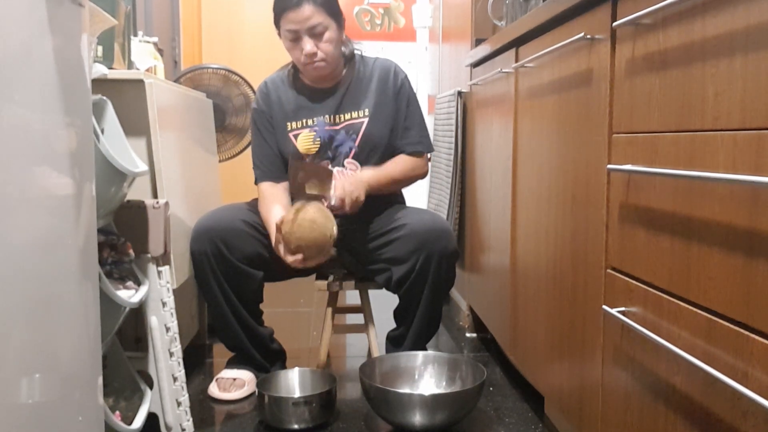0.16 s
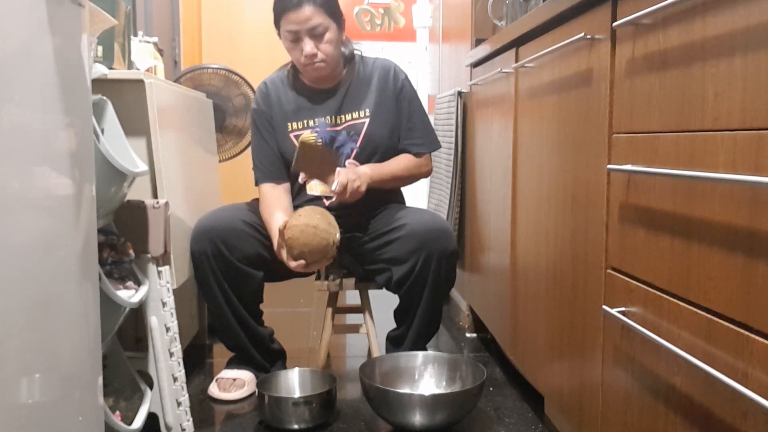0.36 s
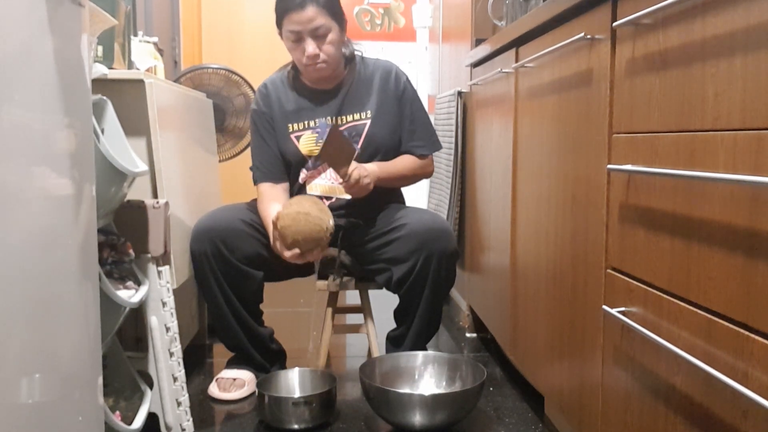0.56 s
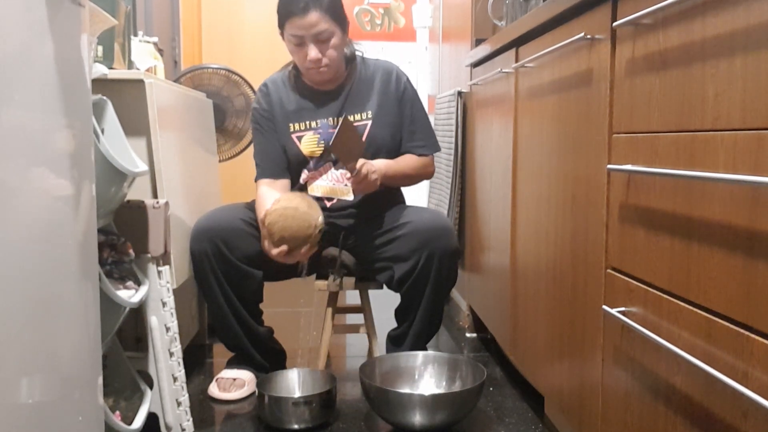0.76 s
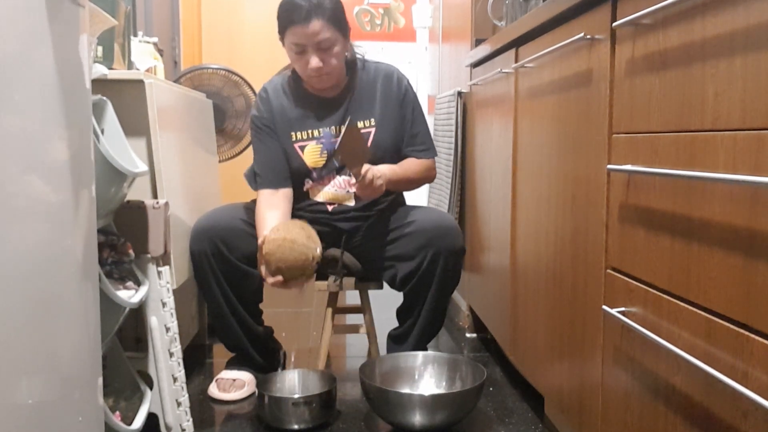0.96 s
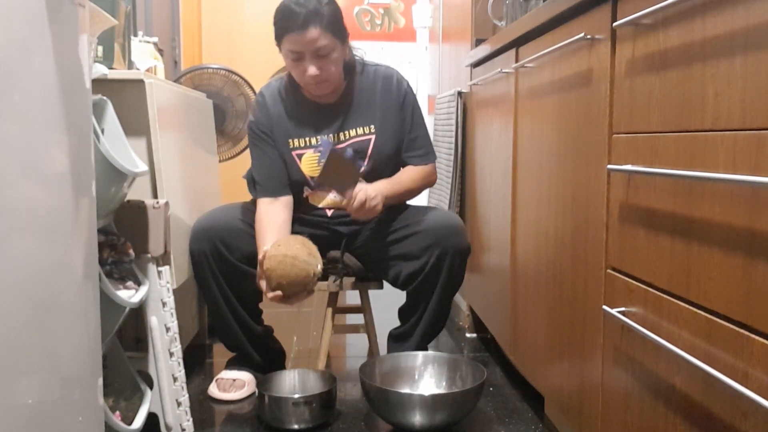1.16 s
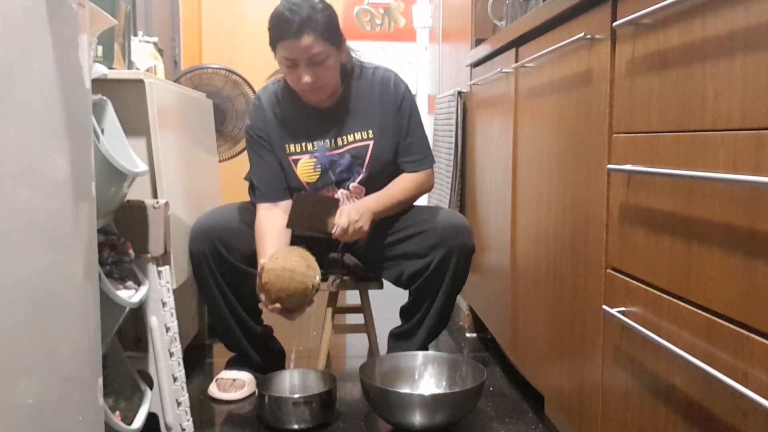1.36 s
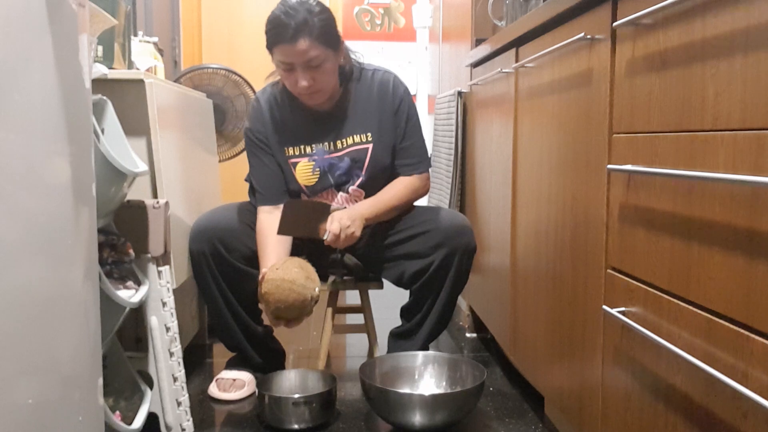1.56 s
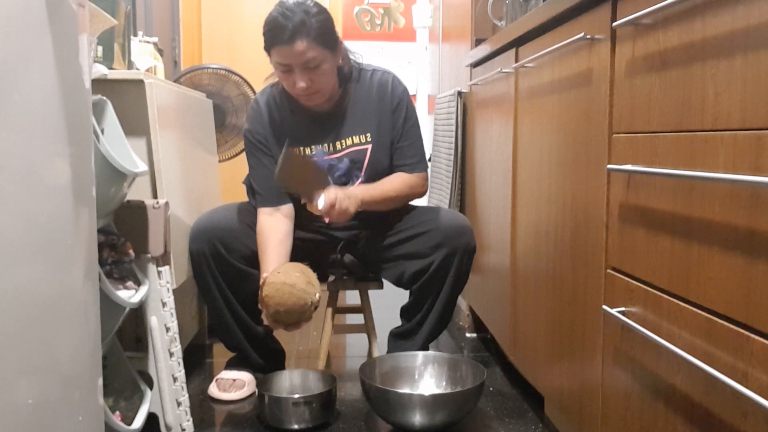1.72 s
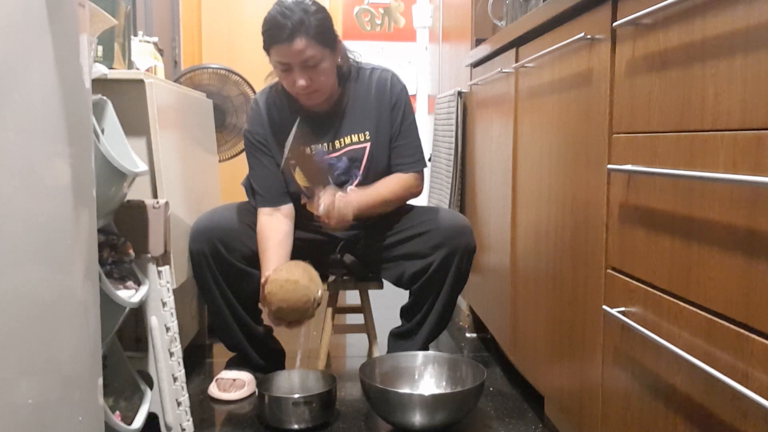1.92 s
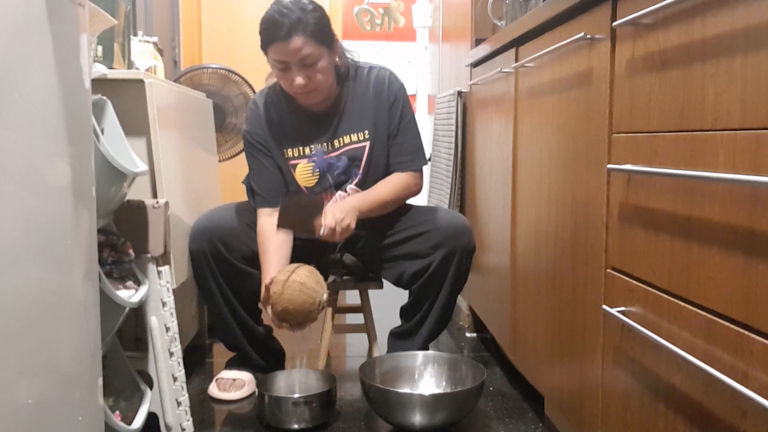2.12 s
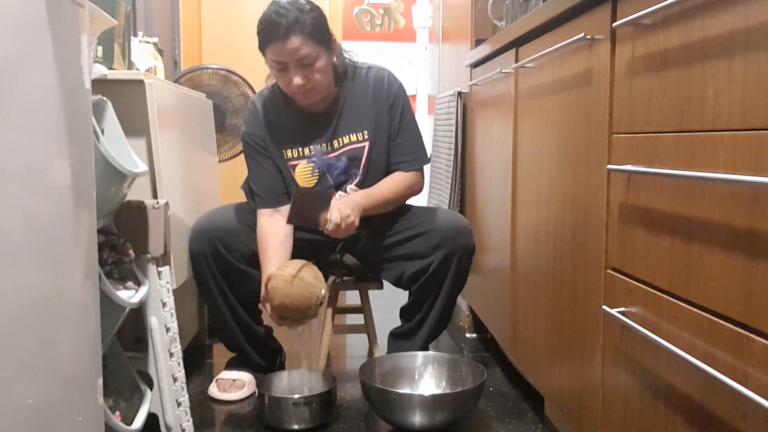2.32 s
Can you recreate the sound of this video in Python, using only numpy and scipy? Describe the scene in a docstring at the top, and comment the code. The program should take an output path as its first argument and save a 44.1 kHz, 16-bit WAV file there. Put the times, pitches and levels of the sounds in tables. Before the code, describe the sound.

Two sharp cleaver knocks on a hand-held coconut, its water trickling into a steel pot after the first

```python
"""A narrow, hard-walled kitchen, heard by a pair of microphones over a low room hum.
A cleaver strikes a hand-held coconut twice: noise bursts crack the shell, decaying sines ring nut and blade.
After the first blow coconut water dribbles into a steel pot: spatter and drops are short noise bursts,
bubbles are rising chirps, and the pot is a set of resonators driven by noise and drop strikes.
No distance is set; the balance of direct sound to room decay makes a source seem near or far."""
import sys
import numpy as np
from scipy import signal
from scipy.fft import rfft, irfft, next_fast_len
from scipy.io import wavfile

SR = 44100
rng = np.random.default_rng(int(sys.argv[2]) if len(sys.argv) > 2 else 0)


def materialize(psi):
    """Save the field psi as 16-bit PCM at rate SR to the path in sys.argv[1].

    A 1-D psi becomes a single channel; in a 2-D psi each row is a channel.
    """
    bounded = np.clip(np.atleast_2d(psi).T, -1, 1)
    quanta = np.round(bounded * 32767).astype(np.int16)
    wavfile.write(sys.argv[1], SR, quanta)


N = 103635

# All levels are relative until their sources are mixed; colours are per third octave.
# kitchen reverberation: pitch_hz, t60_s, left_right_likeness (0-1), left_minus_right_db
ROOM = [(79.6, 0.38, 0.93, 2.5), (300, 0.23, 0.97, 0.5), (556, 0.34, 0.52, 2), (1120, 0.27, 0.07, 1),
        (2600, 0.31, 0, 5), (5030, 0.32, 0.02, 4.5), (9300, 0.3, 0, 7.5), (15000, 0.25, 0.2, 0)]
# background hum: pitch_hz, level_db
HUM_COLOUR = [(20, -89), (35, -59), (50, -56), (63, -53), (85, -62), (125, -55), (160, -71), (200, -62.5),
              (260, -63), (450, -57), (750, -59.5), (1100, -67), (2200, -66.5), (3300, -76.5),
              (5000, -83.5), (7500, -98), (11000, -75.5), (16000, -89)]
# swell of the deep rumble: time_s, level_db
RUMBLE_SWELL = [(0, 2), (.5, 1), (.8, 4), (1.1, 3.5), (1.35, 2.5), (1.7, 1), (1.95, -4.5), (2.35, -5)]
# cleaver blows: start_s, level_db, crack_above_room_db, crack_time_constant_s
BLOWS = [(.2049, 1, -0.5, 0.0044), (2.0237, 1.5, 7.5, 0.0049)]
# colour of the cracking shell: pitch_hz, first_blow_db, second_blow_db
CRACK_COLOUR = [(35, -69, -66), (79, -40, -40.5), (125, -34, -51), (162, -42, -43.5), (256, -22, -38),
                (388, -26.5, -26.5), (625, -26, -29.5), (754, -30.5, -31), (1090, -26, -34.5),
                (1440, -22, -30.5), (2450, -19, -24.5), (3350, -27.5, -28.5), (4970, -31.5, -36),
                (7570, -37, -43), (10130, -26.5, -25.5), (13500, -35, -33), (16200, -38, -36)]
# resonances of the hollow nut and, lowest, of the narrow room around it: pitch_hz
NUT_HZ = [118.5, 203, 229, 321, 383, 455, 508, 552, 830, 899, 1120, 1509, 1841, 2434, 2536]
# their decay: t60_s
NUT_T60_S = [0.27, 0.35, 0.22, 0.19, 0.16, 0.22, .33, 0.24, 0.11, 0.31, 0.094, 0.39, 0.32, 0.091, 0.13]
# their level, one row per blow: level_db
NUT_DB = [
    [-15.5, -30, -20, -16, -16, -31, -23.5, -24, -32, -35, -23.5, -30, -24, -18, -29],
    [-48, -30.5, -30, -17, -12.5, -21, -24, -25, -22, -29, -30, -47, -49, -28, -21],
]
# modes of the blade: pitch_hz
BLADE_HZ = [1997, 3900, 8834, 9028, 9677, 14050]
# their decay: t60_s
BLADE_T60_S = [.48, 1.13, 0.38, 0.25, .26, .25]
# their level, one row per blow: level_db
BLADE_DB = [
    [-25.5, -57.5, -43, -40, -40, -52],
    [-37.5, -62, -35, -32, -31, -44],
]
# flow of the dribble: time_s, level_db
FLOW = [(0, -60), (.48, -24), (.51, -3), (.56, -7), (.61, -34.5), (.66, -21), (.79, -17), (.82, -1.5),
        (.92, -2), (1.03, -15), (1.08, -8), (1.25, -1.5), (1.45, -7), (1.54, -6), (1.65, -0.5), (1.8, -6.5),
        (1.92, -11), (2.0, -18.5), (2.12, 2), (2.27, 0), (2.35, 1.5)]
# colour of spatter in the pot: pitch_hz, level_db
SPATTER_COLOUR = [(250, -55), (600, -62.5), (1100, -73.5), (2200, -62), (4200, -67), (7000, -68),
                  (9800, -51), (12500, -58), (16000, -59)]
# centres of the droplet registers: pitch_hz
REGISTERS_HZ = [2000, 6000, 12000]
# big drops: start_s, splash_db, floor_tap_db, pot_ring_db
DROPS = [(0.6231, 2, -6, -30), (0.812, -6, -27, -11), (0.883, -4, -2, -6), (0.9074, 3.5, 6, -3.5),
         (1.047, 13, 10.5, 1.5), (1.166, 7.5, -16, 1), (1.225, 3, 2.5, -17), (1.2934, 2.5, 3, -3.5),
         (1.4715, -4, -6, -21), (1.5736, 3.5, 6.5, -22), (1.639, -1, 9, -33), (1.7163, 2.5, 8.5, -12),
         (1.7599, 7, -9, -16), (1.7903, -14, 3.5, -28), (1.8572, 5, -0.5, -13), (2.261, 2, 8, -33),
         (2.327, -18, 6, -28)]
# colour of a drop tapping the pot floor: pitch_hz, level_db
TAP_COLOUR = [(300, -84), (700, -80), (1200, -80), (2200, -69), (4200, -54), (6500, -60), (10000, -68),
              (16000, -77)]
# air bubbles in the pooled water: start_s, pitch_hz, level_db, t60_s
BUBBLES = [(0.813, 8160, -33, .004), (.908, 4430, -35, 0.012), (1.166, 10740, -32.5, 0.012),
           (1.473, 13000, -37, .008), (1.639, 3470, -37, 0.0089), (1.643, 2500, -40, .008),
           (1.65, 3170, -36, 0.015), (1.663, 2820, -44, 0.018), (1.717, 2940, -41, 0.081),
           (1.792, 4320, -36, 0.011)]
# modes of the pot: pitch_hz, width_hz, level_db, fall_hz_per_s
POT_MODES = [(578, 21, -57, 9.88), (855, 23, -51.5, 160), (1422, 17.7, -57.5, 110)]
# stream drumming on the bare pot floor: time_s, level_db
DRUMMING = [(0, -60), (.7, -14), (.79, -11), (.9, -6), (.97, -2.5), (1.02, -13), (1.07, 0), (1.14, -2),
            (1.2, 0.5), (1.35, -2), (1.44, -6.5), (1.5, -15), (2.35, -23)]

BANDS_HZ = 1000 * 2 ** (np.arange(-16, 13) / 3)  # third-octave centres
RING_SIZE = 24000  # samples in an impact or ring
ROOM_ONSET_S = 0.0011
MAINS_HZ, MAINS_DB, RUMBLE_TOP_HZ = 120, -52.5, 110
CRACK_PAN_DB, CRACK_RISE_S = 4, 0.00029  # full pan from 2000 Hz up; shortest rise of any impact
MODE_RISE_CYCLES = 0.31
DROPS_PER_S, DROP_SPREAD_DB = 130, 6.5  # small droplets
BUBBLE_RISE_PER_S, BUBBLE_ECHO = 0.48, 1  # share of pitch gained per s; echo rms over rms of the decaying chirp
FIZZ_PER_S, FIZZ_CYCLES = 140, 10  # bubbles; cycles per decay time constant
FIZZ_DB, FIZZ_SPREAD_DB = -34.5, 8.5  # levels lie one to three spreads below FIZZ_DB
FIZZ_LOW_HZ, FIZZ_HIGH_HZ = 4700, 14500
SPLASH_DB, DROP_CUT_DB = 0.5, 5.5  # splash lift; cut of splash and tap together
POT_STRIKE_DB, POT_TUNED_S = 8.5, 0.99  # strike of a big drop; time when the modes have their listed pitch
LOW_CUT_HZ, TOP_HZ = 58, 15750  # range of the recorder


def undb(db):
    """Decibels to gain."""
    return 10 ** (np.asarray(db) / 20)


def at(table, hz, axis=1):
    """A column of a frequency table, read at hz on a logarithmic pitch scale."""
    table = np.array(table, float)
    return np.interp(np.log(hz), np.log(table[:, 0]), table[:, axis])


def curve(table):
    """Gain over time from (time_s, level_db) points."""
    return undb(np.interp(np.arange(N) / SR, *np.array(table, float).T))


def unit(x):
    """Scale to rms 1."""
    return x / np.sqrt(np.mean(x ** 2))


def pan(db):
    """Left and right gains for a level difference."""
    return undb(np.array([[db], [-db]]) / 2)


def fade(t, t60):
    """Exponential decay by 60 dB in t60 seconds."""
    return np.exp(-np.log(1000) * t / t60)


def add(out, start, x):
    """Mix a sound in at its start time."""
    i = int(start * SR)
    out[:, i:i + x.shape[1]] += x[:, :N - i]


def band(hz, size):
    """A band of noise around hz, spread between left and right as the room spreads it."""
    bins_hz = np.maximum(np.arange(size // 2 + 1) * SR / size, 1)
    thirds_away = 3 * np.log2(bins_hz / hz)
    window = np.cos(np.pi / 2 * np.clip(thirds_away, -1, 1))
    mid, side = irfft(rfft(rng.standard_normal((2, size))) * window, size)
    like = np.clip(at(ROOM, hz, axis=2), -1, 1)
    # mid is common to both microphones, side is opposite in them
    stereo = np.sqrt(1 + like) * mid + np.sqrt(1 - like) * side * np.array([[1], [-1]])
    return unit(stereo) * pan(at(ROOM, hz, axis=3))


def hum():
    """Low rumble with its own swell, a mains tone and faint hiss, built from noise bands."""
    out = undb(MAINS_DB) * np.sin(2 * np.pi * MAINS_HZ * np.arange(N) / SR)
    swell = curve(RUMBLE_SWELL)
    for hz in BANDS_HZ:
        noise = undb(at(HUM_COLOUR, hz)) * band(hz, next_fast_len(N))[:, :N]
        out = out + noise * (swell if hz < RUMBLE_TOP_HZ else 1)
    return out


def impact(colour_db, direct_db, direct_s):
    """A short burst followed by the decay of the room, band by band; the lows build up more slowly."""
    t, out = np.arange(RING_SIZE) / SR, 0
    for hz, db in zip(BANDS_HZ, colour_db):
        burst = undb(direct_db) * np.exp(-t / direct_s) * pan(CRACK_PAN_DB * min(hz / 2000, 1))
        tail = (1 - np.exp(-t / ROOM_ONSET_S)) * fade(t, at(ROOM, hz))
        rise = 1 - np.exp(-t / (CRACK_RISE_S + .5 / hz))
        shape = np.hypot(burst, tail) * rise
        # hold the band to the energy of its shape, whatever the noise draws
        out = out + undb(db) * unit(band(hz, RING_SIZE) * shape) * np.sqrt(np.mean(shape ** 2))
    return out


def ring(modes_hz, t60s, levels_db):
    """Struck modes as decaying sines, out of step at the two microphones where the room is less alike."""
    t, out = np.arange(RING_SIZE) / SR, 0
    for hz, t60, db in zip(modes_hz, t60s, levels_db):
        apart = np.arccos(np.clip(at(ROOM, hz, axis=2), -1, 1))
        phase = apart * np.array([[.5], [-.5]]) + np.pi * rng.random()
        swell = 1 - np.exp(-(hz * t / MODE_RISE_CYCLES) ** 2)
        tone = np.sin(2 * np.pi * hz * t + phase) * swell * fade(t, t60)
        out = out + undb(db) * tone * pan(at(ROOM, hz, axis=3))
    return out


def cleaver():
    """Each blow cracks the shell and rings nut and blade, differently at each spot."""
    out = np.zeros((2, N))
    for k, (start, db, crack_db, crack_s) in enumerate(BLOWS):
        crack = impact(at(CRACK_COLOUR, BANDS_HZ, axis=k + 1), crack_db, crack_s)
        nut = ring(NUT_HZ, NUT_T60_S, NUT_DB[k])
        blade = ring(BLADE_HZ, BLADE_T60_S, BLADE_DB[k])
        add(out, start, undb(db) * (crack + nut + blade))
    return out


def dribble():
    """Small droplets spatter at random, each size in its own register, as strongly as the water flows."""
    out, octaves = 0, np.log2(REGISTERS_HZ)
    for own in np.eye(len(octaves)):
        share = np.interp(np.log2(BANDS_HZ), octaves, own) + 1e-6  # keeps the logarithm finite
        colour_db = at(SPATTER_COLOUR, BANDS_HZ) + 10 * np.log10(share)
        landed = rng.random(N) < DROPS_PER_S / SR
        hits = landed * undb(DROP_SPREAD_DB * np.clip(rng.standard_normal(N), -2, 2))
        splash = impact(colour_db, direct_db=11.5, direct_s=.0012)
        # energy of one splash set so that the steady spatter has the table's level
        splash = splash / np.sqrt(np.sum(splash ** 2) / 2) * np.linalg.norm(undb(colour_db))
        drive = (unit(hits) * curve(FLOW))[None]
        out = out + signal.fftconvolve(drive, splash, axes=1)[:, :N]
    return out


def bubble(hz, t60, size=12000):
    """A bubble chirps upward and echoes in pot and room."""
    t = np.arange(size) / SR
    chirp = np.sin(2 * np.pi * hz * t * (1 + BUBBLE_RISE_PER_S * t / 2)) * fade(t, t60)
    reflections = rng.standard_normal((2, size)) * fade(t, 0.3 * at(ROOM, hz))
    echo = signal.fftconvolve(chirp[None], reflections, axes=1)[:, :size]
    return (.5 * chirp + BUBBLE_ECHO * unit(echo) * chirp.std()) * pan(at(ROOM, hz, axis=3))


def fizz():
    """Tiny bubbles burst in the pool at random pitches, leaning high, as strong as the flow."""
    out, flow = np.zeros((2, N)), curve(FLOW)
    for when, pitch, size in rng.random((int(FIZZ_PER_S * N / SR), 3)):
        hz = FIZZ_LOW_HZ * (FIZZ_HIGH_HZ / FIZZ_LOW_HZ) ** np.sqrt(pitch)
        gain = flow[int(when * N)] * undb(FIZZ_DB + FIZZ_SPREAD_DB * (2 * size - 3))
        t60 = np.log(1000) * FIZZ_CYCLES / hz
        add(out, when * N / SR, gain * bubble(hz, t60))
    return out


def drops():
    """Big drops splash and tap the pot floor as noise bursts; trapped air adds bubble chirps."""
    out = np.zeros((2, N))
    for start, splash_db, tap_db, _ in DROPS:
        splash = undb(at(SPATTER_COLOUR, BANDS_HZ) + SPLASH_DB + splash_db)
        tap = undb(at(TAP_COLOUR, BANDS_HZ) + tap_db)
        colour_db = 20 * np.log10(np.hypot(splash, tap)) - DROP_CUT_DB
        add(out, start, impact(colour_db, direct_db=11.5, direct_s=0.0012))
    for start, hz, db, t60 in BUBBLES:
        add(out, start, undb(db) * bubble(hz, t60))
    return out


def pot():
    """The stream and the big drops keep the steel pot's modes ringing; its notes sink as it fills."""
    t, out = np.arange(N) / SR, 0
    for hz, width, db, fall in POT_MODES:
        pole = np.exp(-np.pi * width / SR)
        noise = rng.standard_normal((2, N)) + 1j * rng.standard_normal((2, N))
        push = noise * np.sqrt(1 - pole ** 2) * curve(DRUMMING)
        for start, _, _, ring_db in DROPS:
            strike = undb(POT_STRIKE_DB + ring_db) * np.exp(2j * np.pi * rng.random())
            push[:, int(start * SR)] += strike
        # resonate around zero pitch, then turn the result up to the sinking note
        ringing = signal.lfilter([1], [1, -pole], push)
        turn = np.exp(2j * np.pi * np.cumsum(hz - fall * (t - POT_TUNED_S)) / SR)
        out = out + undb(db) * np.real(ringing * turn)
    return out


def scene():
    """The room, the blows and the running water."""
    return hum() + cleaver() + dribble() + fizz() + drops() + pot()


def record(dry):
    """The recorder thins the deep bass, rounds the highest peaks and cuts the top."""
    low_cut = signal.butter(3, LOW_CUT_HZ, "high", fs=SR, output="sos")
    thin = signal.sosfilt(low_cut, dry)
    held = .92 * thin / (1 + thin ** 6) ** (1 / 6)
    top_cut = signal.ellip(10, .2, 80, TOP_HZ, fs=SR, output="sos")
    return signal.sosfilt(top_cut, held)


dry = scene()
out = record(dry)
materialize(out)
```